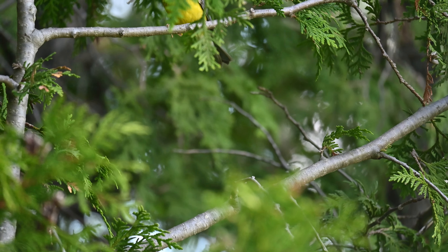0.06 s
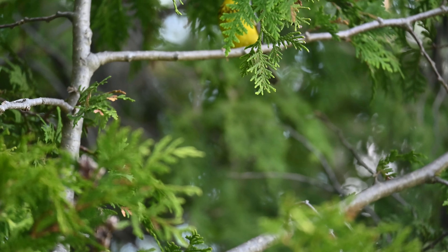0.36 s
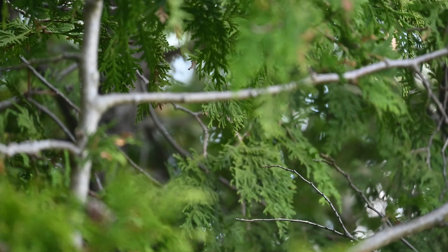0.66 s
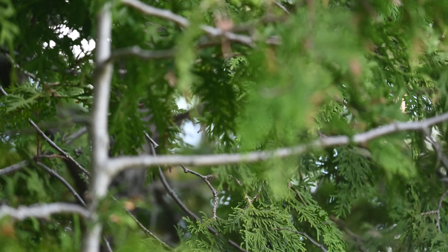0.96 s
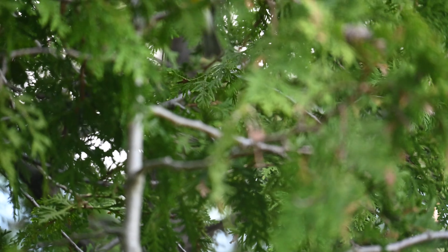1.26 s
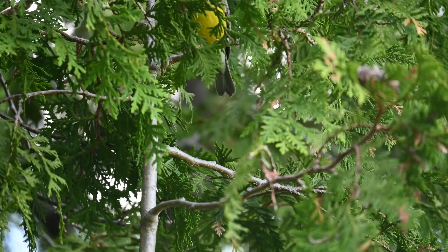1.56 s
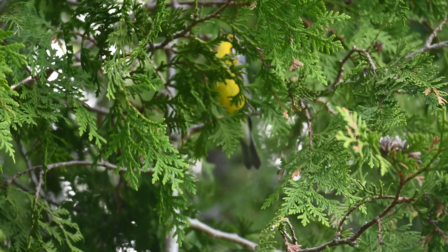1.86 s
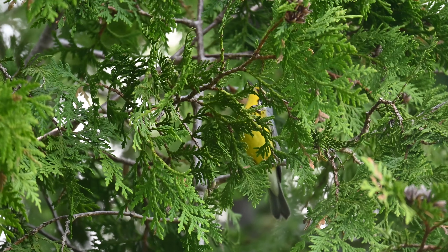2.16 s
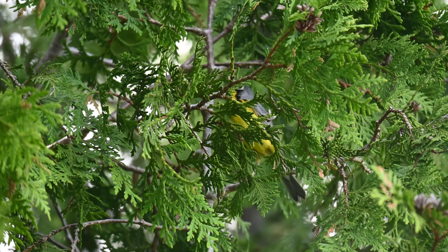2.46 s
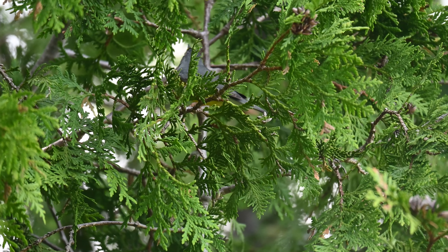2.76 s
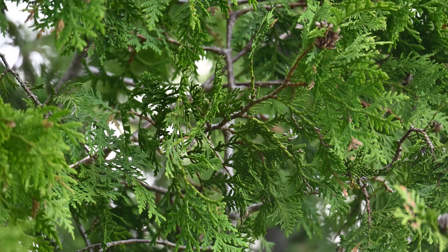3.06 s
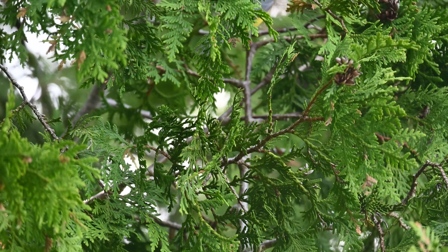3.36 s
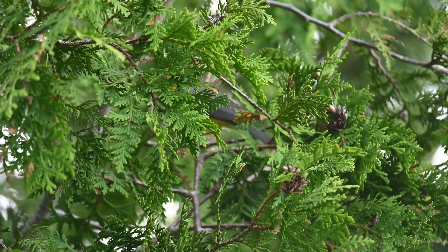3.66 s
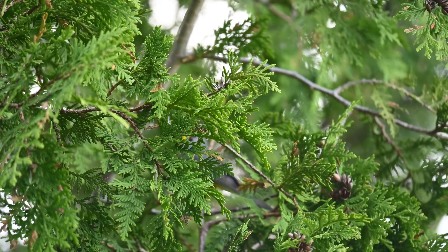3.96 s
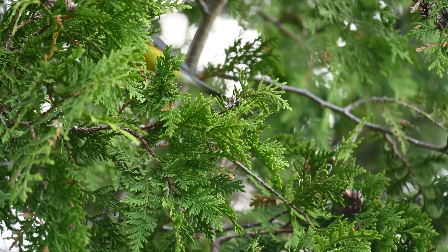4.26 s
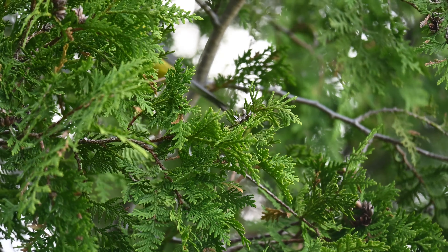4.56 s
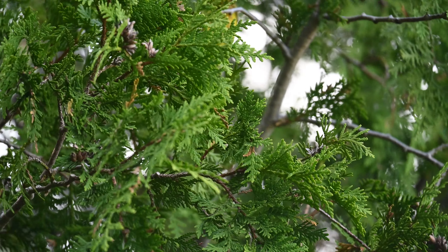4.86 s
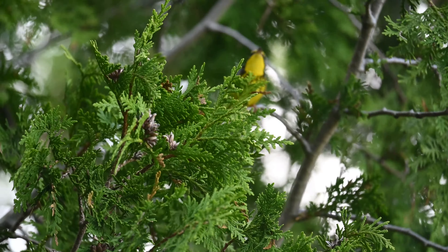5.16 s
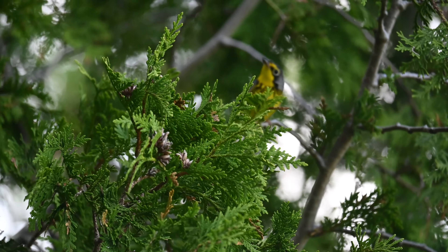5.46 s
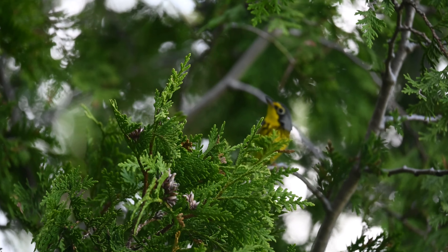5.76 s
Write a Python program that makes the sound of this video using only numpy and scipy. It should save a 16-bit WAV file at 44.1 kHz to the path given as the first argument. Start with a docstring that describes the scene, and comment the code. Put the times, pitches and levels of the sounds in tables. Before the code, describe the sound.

A warbler gives two sharp chips, a quick jumbled phrase of high whistled notes, then a few faint calls over low outdoor hiss.

```python
"""Among trees, a warbler in a cedar a few metres away gives two sharp chips, a quick jumbled phrase and,
later, four thin calls. Each note is a gliding whistle from the syrinx, whose two sides can oscillate
independently and so sound two pitches at once. Foliage scatters the song and the trees reverberate.
Beneath it lie a distant bird, small ticks and bumps of a hand-held camera, a low outdoor hiss,
a faint hum and a dull drone that swells towards the end."""
import sys
import numpy as np
from scipy import signal
from scipy.fft import rfft, irfft
from scipy.io import wavfile
from scipy.ndimage import uniform_filter1d

SR = 44100
rng = np.random.default_rng(int(sys.argv[2]) if len(sys.argv) > 2 else 0)


def output_pcm(signal):
    """Save a mono or channel-first signal as 16-bit PCM at the path in sys.argv[1].

    Samples are clipped to [-1, 1] before scaling.
    """
    pcm = np.clip(np.atleast_2d(signal).T, -1, 1) * 32767
    wavfile.write(sys.argv[1], SR, np.round(pcm).astype(np.int16))


N = 256284
T = np.arange(N) / SR

# Levels in the tables are relative; filters and envelopes act on them afterwards.
# chips: t/s and f/Hz of the snap, snap level/dB, tail level/dB, left minus right/dB
CHIP_NOTES = [(0.7404, 6880, -19.5, -35, -4), (.9793, 5990, -30.5, -36.5, 0)]
# turning points of pitch, one list a syllable: t/s, f/Hz
SYLLABLE_PITCHES = [
    [(1.056, 3300), (1.067, 4750), (1.074, 5000), (1.0765, 5700), (1.080, 3100), (1.084, 2490),
     (1.095, 4180), (1.110, 4470), (1.123, 4410)],
    [(1.167, 3040), (1.179, 3730), (1.189, 3690), (1.193, 4450), (1.197, 2520), (1.203, 2260),
     (1.224, 3580), (1.242, 3595)],
    [(1.293, 3630), (1.301, 3820), (1.307, 3370), (1.319, 3130), (1.328, 5530), (1.351, 4250),
     (1.362, 4037), (1.380, 4260)],
    [(1.457, 2260), (1.488, 3110), (1.502, 3223), (1.516, 3070), (1.527, 2610)],
    [(1.571, 3270), (1.577, 5010), (1.612, 6240), (1.617, 5750), (1.632, 4920), (1.642, 4060),
     (1.665, 3110), (1.683, 3748), (1.702, 3660)],
    [(1.752, 3550), (1.758, 5100), (1.769, 5910), (1.784, 6140), (1.789, 6500), (1.812, 6140),
     (1.839, 5370), (1.856, 5096), (1.868, 5234)],
    [(1.902, 2010), (1.909, 3400), (1.9145, 5365), (1.927, 4300), (1.942, 3540), (1.950, 2350)],
    [(1.987, 2524), (2.019, 3820), (2.031, 3956), (2.049, 4580), (2.067, 4550), (2.089, 4085),
     (2.095, 3790), (2.117, 3130), (2.122, 2950)],
]
# delivery of each syllable: level/dB, attack/s, swell/dB, overtone gain/dB, left minus right/dB
SYLLABLE_DYNAMICS = [(-32.5, .019, 1, -8, -2.5), (-29.5, .018, 3.5, -6, -2), (-26, .006, 7, -3, -3.5),
                     (-23.5, .014, -2, 6.5, -4.5), (-24, 0.011, 6.5, -1.5, -3), (-23, .010, 7.5, 5, 3.5),
                     (-19, 0.017, 1, 3.5, -3), (-21, 0.0065, 4, -2.5, -5)]
# the other side of the syrinx, opening the fourth syllable: t/s, f/Hz
SECOND_VOICE = [(1.450, 3000), (1.463, 3575), (1.475, 3400)]
# pitch of a dipping call, a soft call and its lower voice: t/s from the call's start, f/Hz
DIP_CALL = [(0, 6970), (.005, 6800), (.010, 4120), (0.017, 3240), (0.024, 6000), (.030, 5760), (.035, 7700),
            (.038, 6900), (0.046, 8770)]
SOFT_CALL = [(0, 6260), (.0075, 7720), (0.0123, 5030), (0.015, 3620), (0.024, 5710), (0.031, 7250),
             (.034, 6500), (0.043, 6360)]
SOFT_CALL_LOW = [(.0085, 5360), (.012, 3460), (.020, 2600)]
# late calls: t/s, pitch curve, level/dB, overtone gain/dB
LATE_CALLS = [(4.438, DIP_CALL, -43, 13), (4.7447, SOFT_CALL, -50, 23.5), (5.129, SOFT_CALL, -50, 18),
              (5.2334, SOFT_CALL, -50.5, 21)]
# harmonics 2, 3 and 4 at the syrinx: level/dB
OVERTONE_LEVELS = [-30.5, -40.5, -37.5]
# transmission of the overtones through the throat: f/Hz, gain/dB
THROAT_RESPONSE = [(2000, 4.5), (6500, 2), (8500, -15), (12000, -6), (16000, -11.5)]
# turbulence at the syrinx: f/Hz, level/dB
RASP_SPECTRUM = [(2500, -11.5), (5000, 0.5), (9000, 0.5), (12000, -2), (15500, -4.5)]
# strength of the voice at each pitch: f/Hz, gain/dB
PITCH_RESPONSE = [(2200, -20), (3000, -10.5), (3700, 0), (5200, 2.5), (6300, -1)]
# notes of the distant bird: t/s, duration/s, first f/Hz, last f/Hz, level/dB
FAR_NOTES = [(2.097, 0.13, 6870, 6870, -70), (2.289, 0.067, 7200, 6850, -66),
             (2.40, 0.074, 5150, 6680, -67), (2.486, .055, 6650, 4200, -62.5), (5.20, .11, 2450, 3010, -66),
             (5.309, 0.102, 3010, 3180, -68)]

# ticks and knocks on the camera body: t/s, level/dB, 60 dB decay time/s
TICKS = [(.1968, -37.5, 0.0088), (1.857, -29, .003), (2.384, -54, .025), (2.9975, -40.5, 0.016),
         (3.466, -52, .02)]
KNOCKS = [(.241, -37, .08), (2.9975, -44, .04), (3.037, -42.5, .05), (2.384, -47, .03), (3.466, -49, .03)]
# soft bumps of the hands: t/s, level/dB, duration/s
BUMPS = [(0.179, -41, 0.025), (.218, -41.5, 0.035), (2.149, -48, 0.095), (2.243, -44, 0.064),
         (2.338, -45.5, 0.093), (2.561, -41, 0.042), (2.629, -49.5, 0.11), (2.884, -45.5, 0.044),
         (3.071, -37.5, 0.045), (3.119, -45.5, 0.049), (3.274, -35.5, 0.023), (3.406, -46, 0.031)]
# spectra of these three contacts: f/Hz, level/dB
TICK_SPECTRUM = [(200, -7), (1500, 2.5), (3500, -10), (6000, -6.5), (8700, -2), (12000, -25), (15500, -5)]
KNOCK_SPECTRUM = [(100, 2), (350, -14.5), (560, 9), (800, -12), (1100, -1), (1700, -26), (3200, -14),
                  (6000, -65)]
BUMP_SPECTRUM = [(20, -21), (50, 5), (90, 4.5), (150, -4.5), (250, -16.5), (500, -52), (2000, -100)]

# outdoor noise: f/Hz, level/dB
AIR_SPECTRUM = [(15, -34), (25, -5), (44, -0.5), (75, 0.5), (133, -2), (297, -11.5), (399, -12.5),
                (523, -14), (598, -15), (741, -16), (1080, -19), (1620, -24.5), (2560, -27.5),
                (6050, -39.5), (15500, -51.5)]
# its stereo width: f/Hz, side minus mid/dB
AIR_WIDTH = [(30, -1), (90, -12.5), (300, -12.5), (700, -7.5), (1400, -1.5), (3000, 4.5), (12000, -1)]
# envelope of its upper hiss: t/s, gain/dB
HISS_ENVELOPE = [(0, 7.5), (.6, 5), (1.2, 4), (2.7, 1), (3.6, 0), (5.8, -1)]
# partials of the hum: f/Hz, level/dB
HUM_PARTIALS = [(82, -50), (166, -56), (328.4, -62)]
# envelope of the hum: t/s, gain/dB
HUM_ENVELOPE = [(0, -13), (.5, 1), (1.2, -2.5), (1.9, -13), (2.6, -19), (5.8, -10.5)]
# noise band of the drone: f/Hz, level/dB
DRONE_SPECTRUM = [(70, -20.5), (105, 5.5), (125, 9), (160, 1.5), (230, -7.5), (330, -41)]
# envelope of the drone: t/s, level/dB
DRONE_ENVELOPE = [(3.8, -74.5), (4.05, -56.5), (4.4, -65), (4.8, -64.5), (5.15, -52), (5.8, -58)]


def chips(top_hz=7800, tail_hz=4650, end_hz=2850, rise_s=.004, plunge_s=.003, tail_s=.019):
    """A fast sweep spreads energy into a snap; the syrinx's other side drops faster, a tone lingers."""
    out = 0
    for at, hz, db, tail_db, lean_db in CHIP_NOTES:
        tail_at = at + plunge_s
        sweep = [(at - rise_s, top_hz, db - 16), (at, hz, db), (tail_at, tail_hz, tail_db - 5),
                 (tail_at + tail_s * .42, tail_hz * .86, tail_db),
                 (tail_at + tail_s, end_hz, tail_db - 11)]
        other_side = [(at - .0007, hz * .86, db - 10), (tail_at + .0007, end_hz, db - 19)]
        lingering = [(tail_at, hz, db - 13), (tail_at + .01, hz, db - 26)]
        out += panned_whistle(sweep, rasp_db=-35, bright_db=-1.5, lean_db=lean_db)
        for gesture in (other_side, lingering):
            out += panned_whistle(gesture, rasp_db=-16.5, bright_db=1, lean_db=lean_db)
    return out


def phrase():
    """Frequency modulation of a nearly pure tone forms eight syllables, with a brief second voice."""
    second_voice = note(SECOND_VOICE, db=-37, attack_s=.01)
    out = panned_whistle(second_voice, rasp_db=-22.5, bright_db=2.5, lean_db=-5)
    for pitch, (db, attack_s, swell_db, bright_db, lean_db) in zip(SYLLABLE_PITCHES, SYLLABLE_DYNAMICS):
        gesture = note(pitch, db, attack_s, swell_db)
        out += panned_whistle(gesture, rasp_db=-41.5, bright_db=bright_db, lean_db=lean_db)
    return out


def late_calls():
    """Turbulence and overtones make thin calls scratchy; the soft ones have two voices (biphonation)."""
    out = 0
    for start, pitch, db, bright_db in LATE_CALLS:
        sides = [(pitch, db)]
        if pitch is SOFT_CALL:
            sides.append((SOFT_CALL_LOW, db + 2))
        for side, side_db in sides:
            gesture = note(np.array(side) + [start, 0], side_db, attack_s=.002)
            out += panned_whistle(gesture, rasp_db=-14.5, bright_db=bright_db, lean_db=1.5)
    return out


def note(pitch, db, attack_s, swell_db=0, release_s=.009, glide_hz_per_s=33000):
    """Amplitude follows pitch: low notes and fast glides are weaker. Gives a gesture: t/s, f/Hz, level/dB."""
    times, hz = np.transpose(pitch)
    times = np.sort(times)
    t = np.arange(times[0], times[-1], 1 / SR)
    hz = np.interp(t, times, hz)
    attack = -13.5 * np.clip(1 - (t - t[0]) / attack_s, 0, 1)
    release = -9 * np.clip(1 - (t[-1] - t) / release_s, 0, 1)
    glide = -1.73 * np.log2(1 + abs(np.gradient(hz)) * SR / glide_hz_per_s)
    swell = swell_db * np.linspace(-.5, .5, len(t))
    strength = 20 * np.log10(response(PITCH_RESPONSE, hz))
    return np.transpose([t, hz, db + swell + attack + release + glide + strength])


def whistle(gesture, rasp_db, bright_db, waver=.0055, flutter_db=1.65, edge_s=.00069):
    """Source and filter: one side of the syrinx oscillates, and the throat weights its overtones."""
    times, hz, db = np.transpose(gesture)
    times = np.sort(times)
    t = np.arange(times[0], times[-1], 1 / SR)
    # the muscles round the corners of the gesture
    hz, db = (uniform_filter1d(np.interp(t, times, c), size=80, mode="nearest") for c in (hz, db))
    plunge = np.clip(-np.gradient(hz) * SR / 500000, 0, 1)  # a steep fall in pitch adds rasp
    hz = hz * (1 + waver * wander(500, t))
    phase = 2 * np.pi * np.cumsum(hz) / SR
    tone = np.sin(phase)
    for k, overtone_db in enumerate(OVERTONE_LEVELS, 2):
        gain = undb(overtone_db + bright_db + 4 * wander(70, t)) * response(THROAT_RESPONSE, k * hz)
        tone += gain * (k * hz < SR / 2) * np.sin(k * phase)
    tone += undb(rasp_db) * (.385 + plunge) * noise(RASP_SPECTRUM, len(t))
    gate = np.clip(np.minimum(t - t[0], t[-1] - t) / edge_s, 0, 1)
    return np.sqrt(2) * tone * gate * undb(db + flutter_db * wander(300, t))


def panned_whistle(gesture, rasp_db, bright_db, lean_db):
    """Directivity: the way the bird's head points gives each whistle a level difference between the ears."""
    out = np.zeros((2, N))
    ear_gains = undb([lean_db / 2, -lean_db / 2])
    add(out, gesture[0][0], np.outer(ear_gains, whistle(gesture, rasp_db, bright_db)))
    return out


def among_trees(direct):
    """Multipath propagation: direct sound, then reflections from twigs, foliage and the wider wood."""
    voice = direct.mean(axis=0)
    twigs = scatter(voice, db=-9, t60=.069, delay_s=.00042)
    duller = colour(voice, [(5500, .75), (7500, -.5)])
    foliage = scatter(duller, db=-12.5, t60=.16, delay_s=.005)
    wood = scatter(duller, db=-21.5, t60=.62, delay_s=.015)
    return direct + twigs + foliage + wood


def scatter(x, db, t60, delay_s):
    """Diffuse reflection: convolution with random, exponentially decaying echoes, separate for each ear."""
    t = np.arange(SR) / SR
    echoes = rng.standard_normal((2, SR)) * rng.exponential(size=(2, SR))
    echoes *= np.exp(-np.log(1000) * t / t60) * np.clip(t / delay_s - 1, 0, 1)
    echoes *= undb(db) / np.sqrt(np.sum(echoes ** 2, axis=1, keepdims=True))
    return signal.fftconvolve(x[None], echoes, axes=1)[:, :N]


def far_bird():
    """Far from a source the reverberant field prevails: only echoes arrive, their overtones lost."""
    notes = np.zeros(N)
    for start, length, first_hz, last_hz, db in FAR_NOTES:
        gesture = [(start, first_hz, db), (start + length, last_hz, db)]
        add(notes, start, whistle(gesture, rasp_db=-48.5, bright_db=-50, waver=.025))
    return scatter(notes, db=2, t60=.26, delay_s=.004)


def camera_handling(width=.7):
    """Impacts excite heavily damped vibration; the hands' soft pushes swell and fade at low frequency."""
    out = np.zeros((2, N))
    t = np.arange(8192) / SR
    for impacts, spectrum in ((TICKS, TICK_SPECTRUM), (KNOCKS, KNOCK_SPECTRUM)):
        for start, db, t60 in impacts:
            ring = noise(spectrum, len(t)) + width * np.outer([1, -1], noise(spectrum, len(t)))
            add(out, start, undb(db) * ring * np.exp(-np.log(1000) * t / t60))
    for start, db, length in BUMPS:
        push = colour(rng.standard_normal((2, len(t))), BUMP_SPECTRUM)
        push *= np.sin(np.pi * np.minimum(t / length, 1)) ** 2
        push *= undb(db) / np.sqrt(np.sum(push ** 2, axis=1, keepdims=True) / (length * SR))
        add(out, start, undb([[4], [-7]]) * push)  # mostly on the left
    return out


def outdoor_air(db=-49, sway_db=.5, rumble_sway_db=.7, rumble_hz=200, hiss_hz=3000):
    """Coherence between the ears sets width: they share a restless rumble under a wide, smooth hiss."""
    side = colour(noise(AIR_SPECTRUM, N), AIR_WIDTH)
    air = undb(db) * (noise(AIR_SPECTRUM, N) + np.outer([1, -1], side))
    rumble = signal.sosfiltfilt(signal.butter(1, rumble_hz, fs=SR, output="sos"), air)
    hiss = signal.sosfiltfilt(signal.butter(1, hiss_hz, "high", fs=SR, output="sos"), air)
    air += rumble * (undb(rumble_sway_db * wander(9, T)) - 1)
    air += hiss * (envelope(HISS_ENVELOPE) - 1)
    # the deepest rumble sits on the left
    left = colour(air[0], [(35, 2), (90, -2.5), (250, 1.5)])
    right = colour(air[1], [(35, -11), (90, -3), (250, 1)])
    return np.array([left, right]) * undb(sway_db * wander(2, T))


def hum(waver=.015, flicker_db=3, right_db=-3):
    """Common frequency modulation fuses three flickering partials into one faint, far-off hum."""
    drift = 1 + waver * wander(6, T)
    partials = np.zeros(N)
    for hz, db in HUM_PARTIALS:
        phase = 2 * np.pi * np.cumsum(hz * drift) / SR
        partials += undb(db + flicker_db * wander(7.7, T)) * np.sin(phase)
    return np.outer(undb([0, right_db]), np.sqrt(2) * partials * envelope(HUM_ENVELOPE))


def drone():
    """A narrow band of low noise is heard as a dull, distant drone, the same in both ears."""
    return noise(DRONE_SPECTRUM, N) * envelope(DRONE_ENVELOPE)


def undb(db):
    """Amplitude ratio of a level in decibels."""
    return 10 ** (np.asarray(db) / 20)


def envelope(points):
    """Gain over the whole scene, interpolated between rows of t/s, level/dB."""
    return undb(np.interp(T, *np.transpose(points)))


def response(spectrum, hz):
    """Gain at hz, interpolated in log frequency between rows of f/Hz, level/dB."""
    f, db = np.transpose(spectrum)
    return undb(np.interp(np.log(hz + 1), np.log(f), db))


def colour(x, spectrum):
    """Zero-phase filtering by multiplication in the frequency domain."""
    size = x.shape[-1]
    return irfft(rfft(x) * response(spectrum, np.fft.rfftfreq(size, 1 / SR)), size)


def noise(spectrum, size):
    """Filtered Gaussian noise of rms 1."""
    x = colour(rng.standard_normal(size), spectrum)
    return x / x.std()


def wander(rate, t):
    """Random modulation with a spread near 1, through `rate` independent values a second."""
    steps = rng.standard_normal(4096)
    return 1.152 * np.interp((t - t[0]) * rate, np.arange(len(steps)), steps)


def add(out, start, x):
    """Superpose x on out from a start time in seconds."""
    i = max(int(start * SR), 0)
    out[..., i:i + x.shape[-1]] += x[..., :N - i]


def scene():
    """Superposition: the pressures of the warbler, its echoes and the background add."""
    warbler = chips() + phrase() + late_calls()
    return among_trees(warbler) + far_bird() + outdoor_air() + hum() + drone() + camera_handling()


def record(dry):
    """Band limiting: the camera's steep low-pass cuts the treble above 15.8 kHz."""
    return signal.sosfilt(signal.ellip(10, .1, 70, 15800, fs=SR, output="sos"), dry)


dry = scene()
out = record(dry)
output_pcm(out)
```